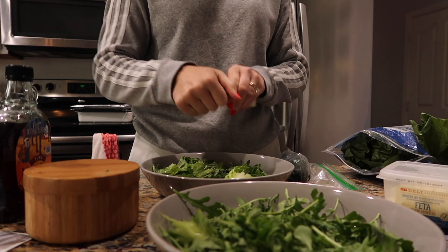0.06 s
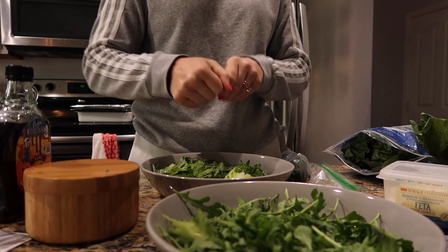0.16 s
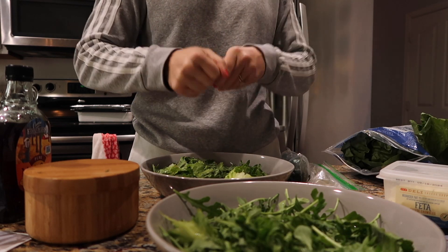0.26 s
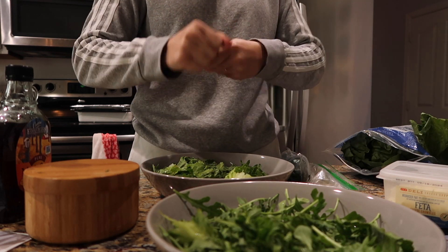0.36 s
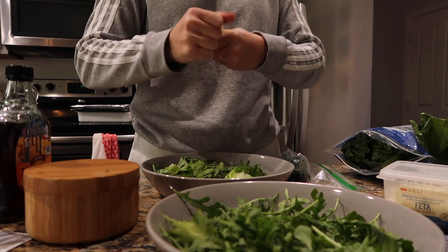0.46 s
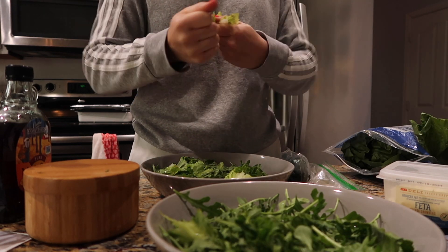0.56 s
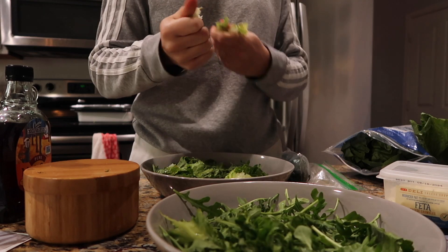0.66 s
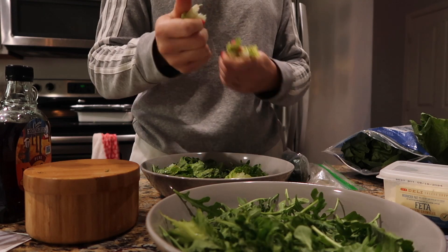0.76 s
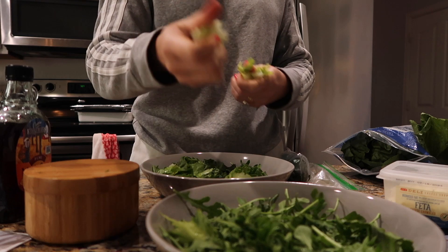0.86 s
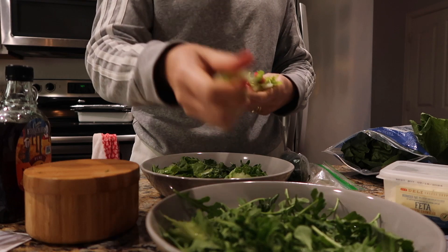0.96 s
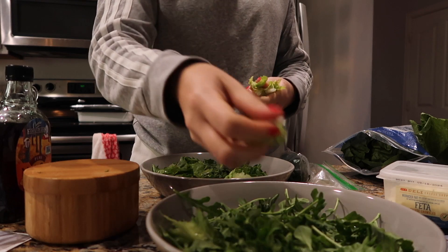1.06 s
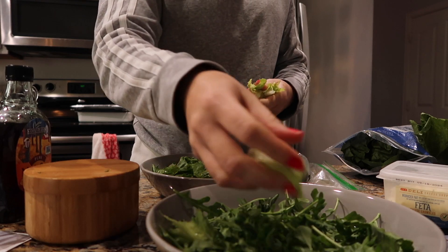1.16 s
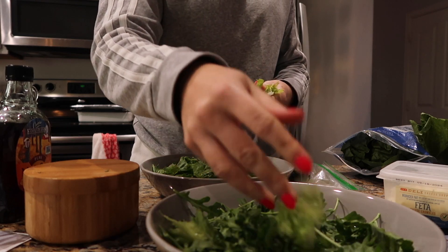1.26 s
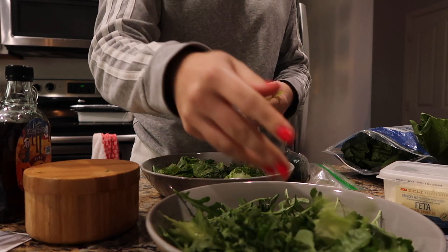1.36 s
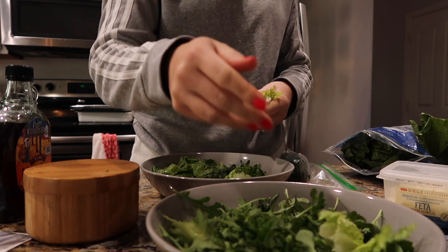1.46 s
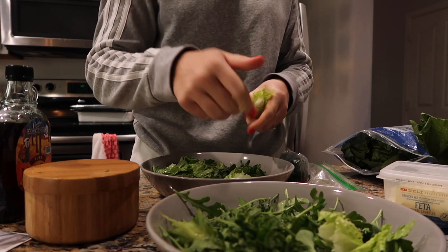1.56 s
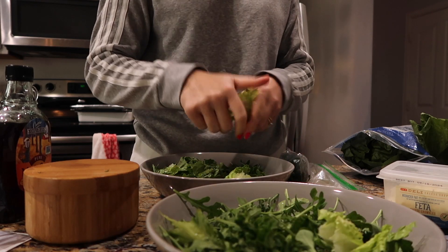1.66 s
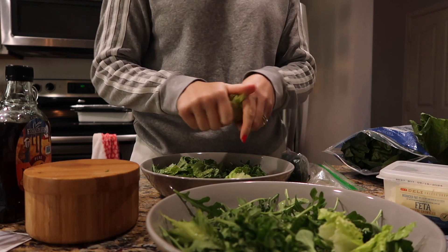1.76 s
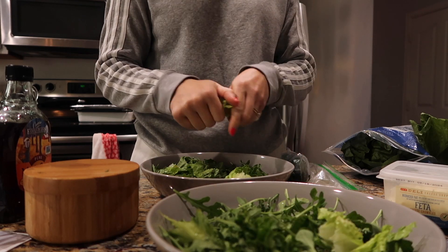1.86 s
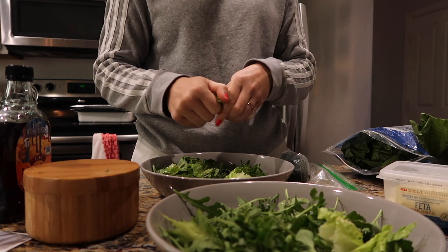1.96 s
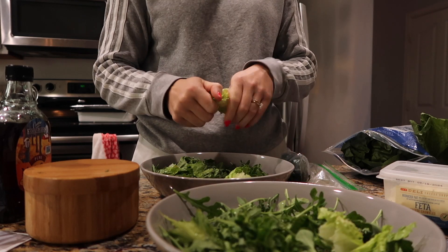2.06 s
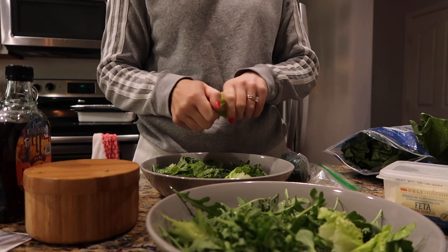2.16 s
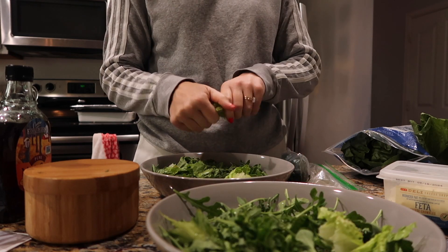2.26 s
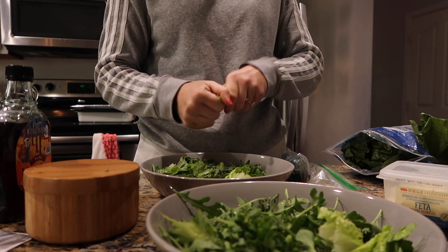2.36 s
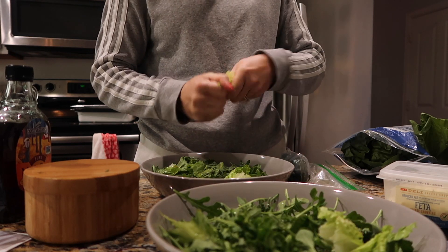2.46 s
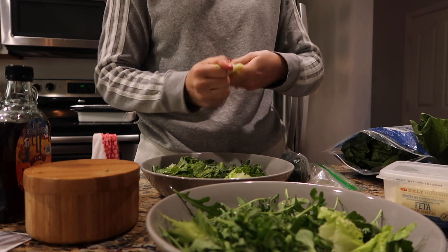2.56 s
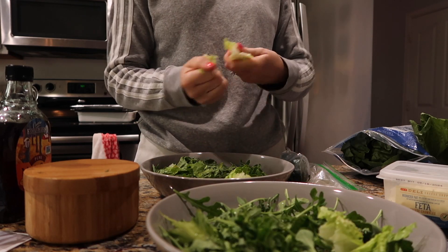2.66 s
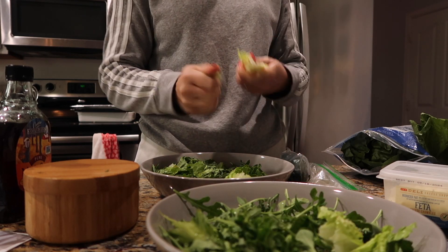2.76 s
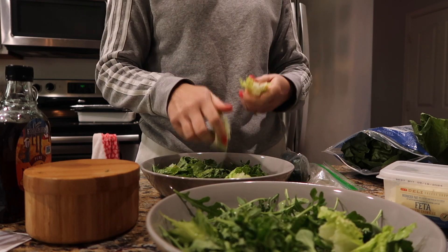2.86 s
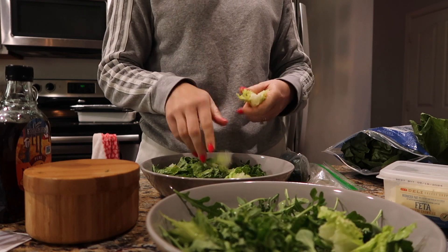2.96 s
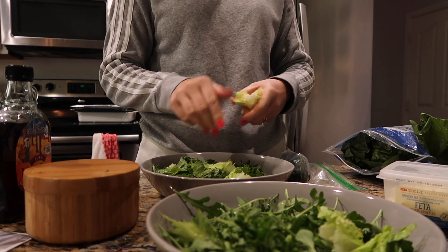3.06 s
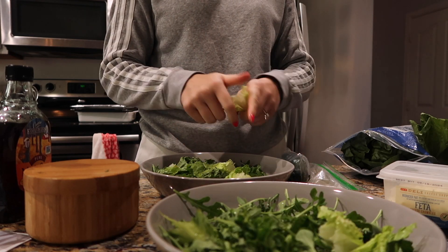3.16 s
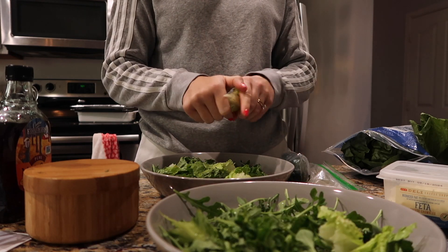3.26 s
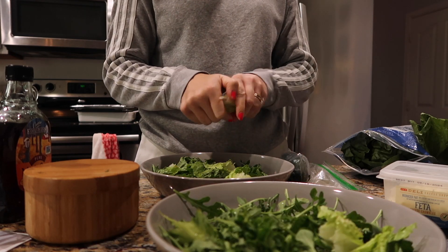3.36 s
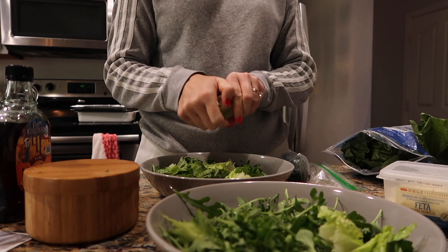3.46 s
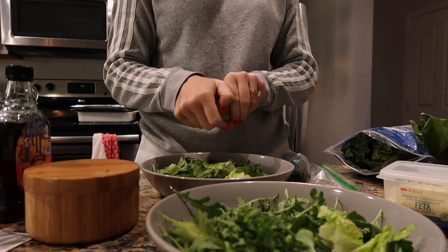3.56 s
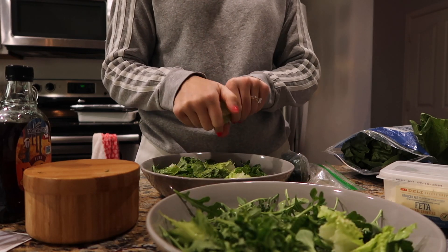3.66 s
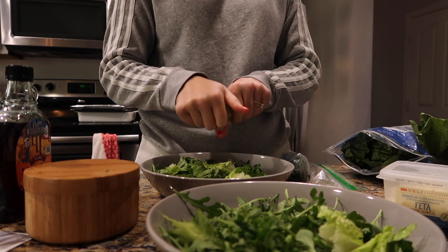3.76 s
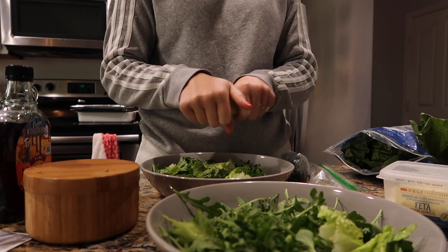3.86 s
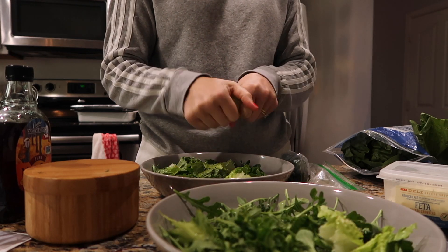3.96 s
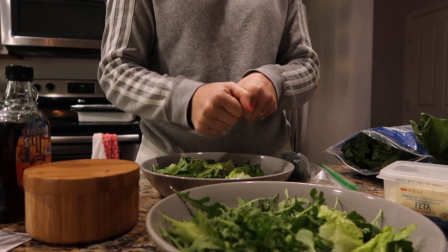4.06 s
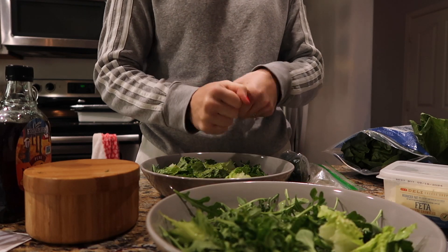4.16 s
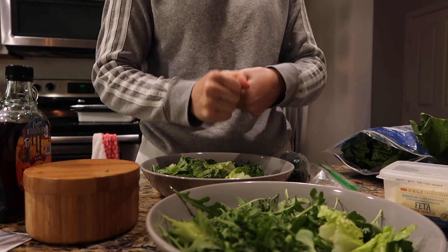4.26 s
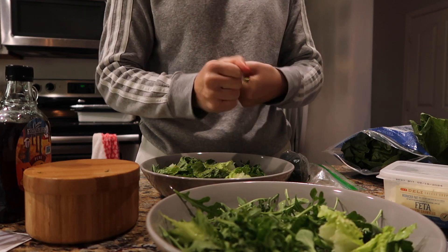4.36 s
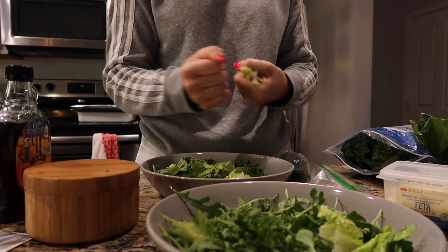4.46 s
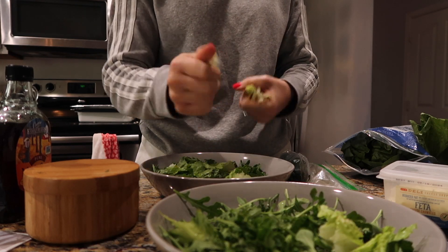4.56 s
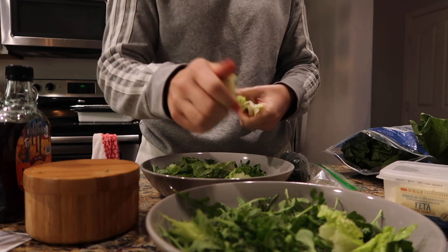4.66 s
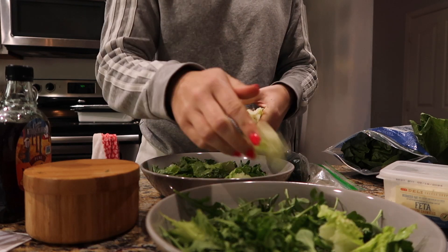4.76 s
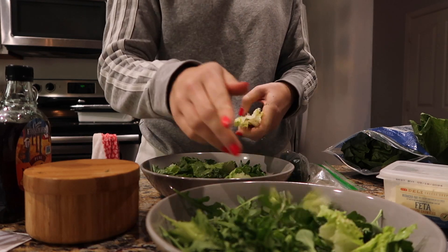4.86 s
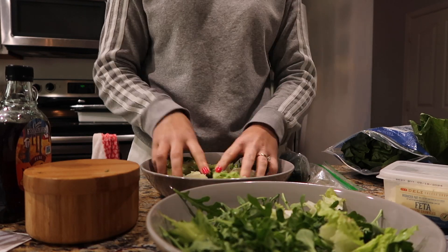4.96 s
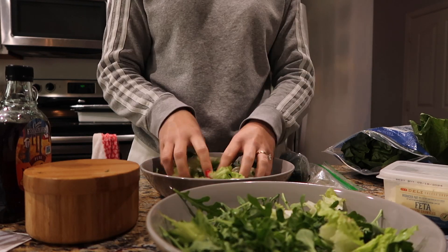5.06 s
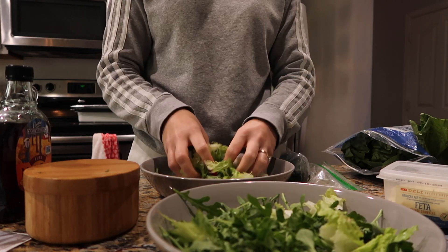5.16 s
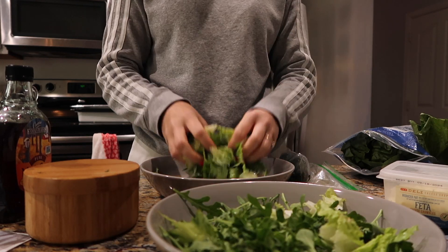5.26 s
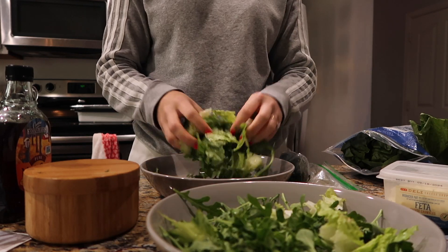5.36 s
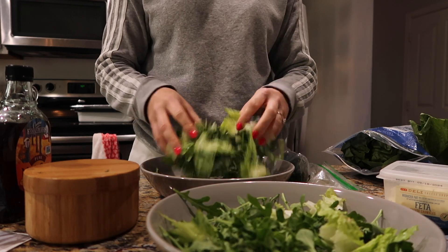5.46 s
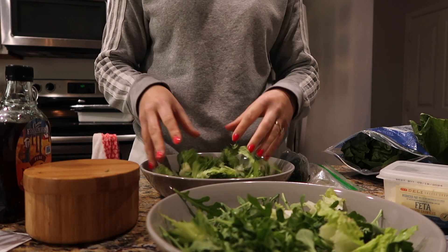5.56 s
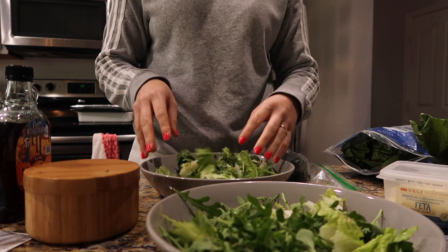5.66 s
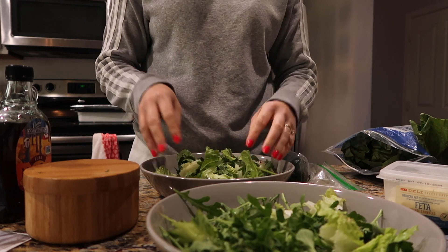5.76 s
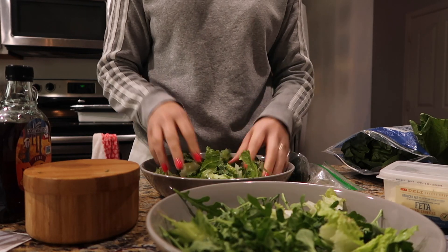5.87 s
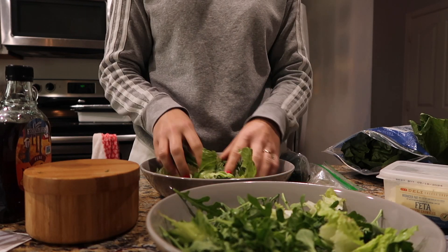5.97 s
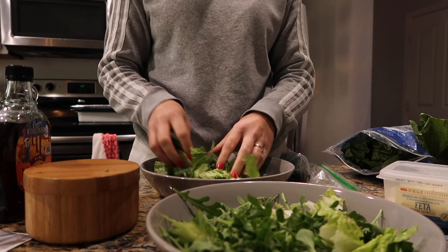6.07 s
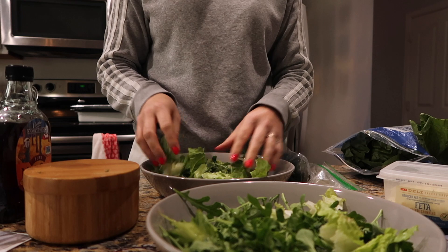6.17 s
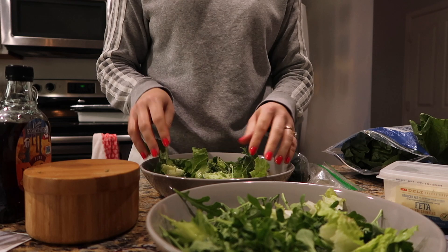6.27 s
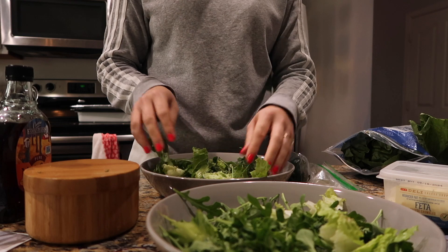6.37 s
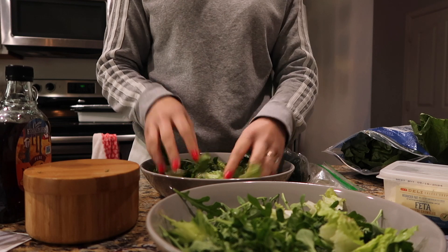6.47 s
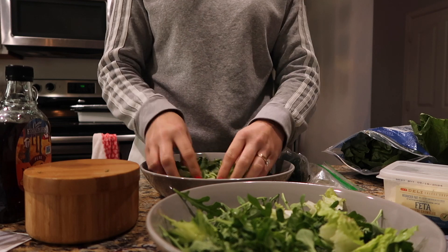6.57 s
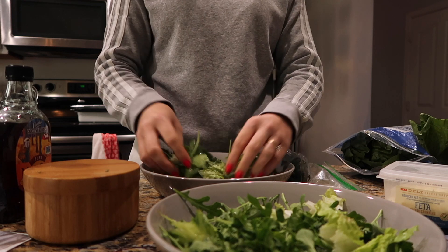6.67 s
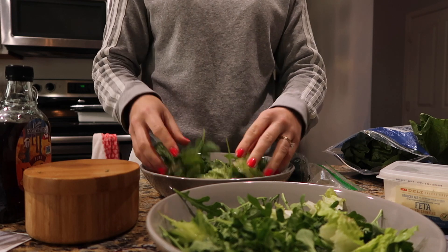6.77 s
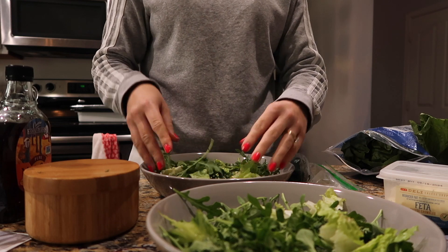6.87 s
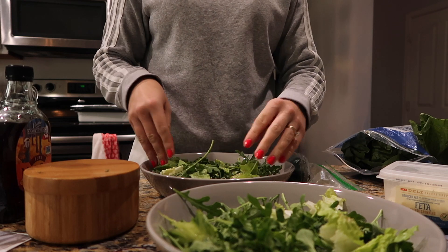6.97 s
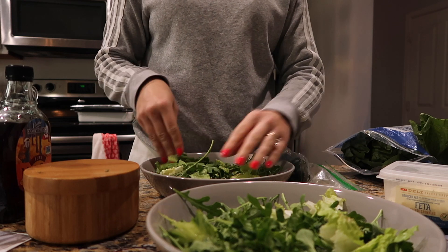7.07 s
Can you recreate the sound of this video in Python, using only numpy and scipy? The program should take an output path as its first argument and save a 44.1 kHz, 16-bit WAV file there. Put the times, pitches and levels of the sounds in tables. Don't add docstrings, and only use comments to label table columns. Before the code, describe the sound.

Juicy lettuce ribs crack and splinter between the palms, with hollow low pops and fine crackle, in separate irregular tears. After the last tear, limp leaves brush softly as fingers stir a ceramic bowl, bumping it and faintly ringing its rim with the nails. Recorded close in stereo in a small reflective kitchen, with short echoes, low fridge hum and faint air.

```python
import sys
import numpy as np
from scipy import signal
from scipy.fft import rfft, irfft, next_fast_len
from scipy.io import wavfile
from scipy.ndimage import uniform_filter1d, map_coordinates

SR = 44100
rng = np.random.default_rng(int(sys.argv[2]) if len(sys.argv) > 2 else 0)


def invert_db(x):
    u = np.asarray(x, float) / 20
    return 10 ** u


def waveform_to_disk(signal):
    frames = np.transpose(np.atleast_2d(signal))
    scaled = np.clip(frames, -1, 1) * 32767
    samples = np.round(scaled).astype(np.int16)
    wavfile.write(sys.argv[1], SR, samples)


N = 313110


def unit(x):
    return x / np.sqrt(np.mean(x ** 2) + 1e-20)


def along(points, hz):
    f, value = np.transpose(points)
    return np.interp(np.log(hz + 1), np.log(f + 1), value)


def filtered(x, response):
    m = next_fast_len(N + SR // 2)
    gain = response(np.fft.rfftfreq(m, 1 / SR))
    return irfft(rfft(x, m) * gain, m)[..., :N]


def bursts(s, db, hz, cycles, fall, rise, size, loose=7):
    s, db, hz, cycles = (np.broadcast_to(v, np.shape(s))[:, None] for v in (s, db, hz, cycles))
    chance = rng.standard_normal((len(s), 2))
    u = np.arange(size) / SR * hz / cycles
    sinking = fall * (1 - np.exp(-u))
    phase = 2 * np.pi * cycles * (u + sinking) + loose * chance[:, :1]
    shape = (u / abs(rise)) ** abs(rise) * np.exp(abs(rise) - u)
    wave = invert_db(db) * shape * np.sin(phase)
    where = (np.round(s * SR).astype(int) + np.arange(size)).ravel()
    pair = (wave, wave * chance[:, 1:])
    return np.array([np.bincount(where, w.ravel(), N + size)[:N] for w in pair])


def cluster(s, db, hz, count, hz_spread, smear, cycles, size, loose=7):
    chance = rng.standard_normal((len(s), count, 3))
    place = np.linspace(-1, 1, count) + chance[..., 0] / count
    pitch = np.asarray(hz)[..., None] * np.exp(hz_spread * place)
    when = s[:, None] + smear * (.8 * chance[..., 1] - .6 * place) - 1.6 * cycles / pitch
    level_db = db[:, None] - 8 * place ** 2 + 0.47 * chance[..., 2]
    return bursts(when.ravel(), level_db.ravel(), pitch.ravel(), cycles, .25, 1.8, size, loose)


def grains(count, hz, hz_spread, cycles, size_db, clump_db, size):
    s = np.sort(rng.random(count)) * N / SR
    pitch = np.clip(hz * np.exp(hz_spread * rng.standard_normal(count)), 100, 16000)
    strength = np.minimum(rng.exponential(size=count), 4.5)
    clumps = map_coordinates(rng.standard_normal(600), [s * 80])
    pair = bursts(s, size_db * strength + clump_db * clumps, pitch, cycles, 0.28, 0.76, size)
    slow = np.sqrt(np.abs(uniform_filter1d(pair[0] ** 2, SR // 8)) + 1e-9)
    return pair / slow


def levels(rows):
    s, *columns = np.transpose(rows)
    return [invert_db(np.interp(np.arange(N) / SR, s, db, -120, -120)) for db in columns]


# (t/s, peak level/dB, leaf pitch f/Hz, cupped-hand boom level/dB)
BREAKING_RIBS = [(0.077, -28.5, 2640, -16), (0.0852, -25.5, 2260, -17.5), (0.0977, -23.5, 3100, -12),
                 (0.12, -23, 2970, -23), (0.1268, -30, 3600, -33), (0.135, -23, 2860, -33.5),
                 (0.158, -24, 1810, -26.5), (0.1688, -31, 3060, -34), (0.178, -25, 2370, -43),
                 (0.187, -25, 2820, -30), (0.222, -20.5, 2590, -54), (0.243, -15, 2420, -34.5),
                 (0.2524, -24, 2960, -37), (0.2588, -20.5, 2700, -39.5), (0.2674, -17.5, 2300, -38),
                 (0.2807, -13.5, 2740, -35), (0.294, -19, 2210, -35), (0.3014, -17.5, 3170, -40),
                 (0.3092, -31, 3320, -36.5), (0.338, -33, 2810, -26), (0.346, -1, 2220, -36.5),
                 (0.351, -12.5, 2480, -32), (0.3565, -10.5, 2420, -31), (0.3603, -11.5, 2900, -38),
                 (0.3683, -6.5, 2800, -34), (0.3721, -6, 3170, -17), (0.375, -16.5, 2630, -37),
                 (0.3809, -16.5, 3200, -21), (0.385, -15, 3120, -40), (0.397, -12, 2930, -24),
                 (0.4052, -14, 3080, -33), (0.4082, 1, 2750, -39), (0.4178, -17.5, 2650, -17),
                 (0.4246, -12, 2840, -15), (0.437, -25, 2400, -21), (0.445, -23, 2600, -21),
                 (0.4644, -31, 2900, -38), (0.4683, -31, 2570, -19), (0.4974, -37, 3240, -23),
                 (0.5, -17.5, 2700, -42), (0.5146, -29, 3270, -36), (0.526, -15, 2800, -26),
                 (0.5374, -18.5, 2800, -20.5), (0.548, -4, 3030, -53), (0.558, -16, 4000, -22),
                 (0.563, -14, 3640, -24), (0.5697, -25, 3380, -23.5), (0.5777, -32, 2650, -28),
                 (1.6321, -24.5, 2890, -14.5), (1.6403, -23.5, 3330, -45), (1.789, -42, 2060, -5),
               (1.863, -33, 3820, -26), (1.9104, -25.5, 3190, -20), (1.915, -36, 3400, -25),
               (1.9431, -27.5, 2900, -28), (1.9625, -32, 2250, -22), (1.995, -24.5, 2260, -35),
               (2.0045, -28, 2670, -26), (2.0154, -17.5, 3820, -16.5), (2.0247, -19, 4830, -34),
               (2.0283, -24, 4600, -24), (2.0292, -24.5, 2150, -30), (2.0375, -21, 4650, -52),
               (2.0448, -33, 4540, -33), (2.0578, -30, 4840, -30), (2.0775, -32, 3100, -27),
               (2.111, -32, 3280, -31), (2.2008, -30, 3160, -18), (2.2107, -32.5, 4040, -18),
               (2.2213, -25.5, 3010, -32.5), (2.24, -36, 3660, -32), (2.2459, -23, 2650, -47),
               (2.2563, -23.5, 3700, -36), (2.266, -24.5, 3550, -44), (2.2782, -27, 2550, -35),
               (2.2901, -39, 3240, -33), (2.305, -33, 2580, -38), (2.3181, -37, 2700, -27),
                 (2.3464, -30, 3420, -17), (2.3626, -26, 3000, -25), (2.3745, -26, 3000, -31),
              (2.389, -27, 3140, -16), (2.393, -23.5, 3660, -49), (2.4031, -22, 2780, -33),
              (2.414, -34, 3740, -18), (2.428, -30, 3600, -29), (2.4363, -38, 2250, -37),
              (2.4416, -31, 3020, -26), (2.4487, -20, 2420, -24), (2.458, -16, 2650, -33),
              (2.4717, -24, 2800, -26), (2.4762, -13, 3140, -37), (2.48, -22, 2450, -5.5),
              (2.4844, -21, 2580, -23), (2.49, -23, 3280, -29), (2.4978, -22.5, 3660, -16),
              (2.5125, -21, 2340, -31), (2.5197, -23, 2530, -37), (2.5337, -22, 3050, -32),
              (2.5423, -7.0, 3000, -15), (2.546, -28, 3470, -23.5), (2.5512, -17, 4300, -37),
              (2.5568, -25, 3500, -6), (2.5609, -21, 2700, -24), (2.565, -17, 3000, -15),
              (2.5731, -14.5, 3300, -30), (2.5817, -23.5, 3530, -28), (2.594, -33.5, 3310, -20),
              (2.5975, -17, 3250, -31), (2.61, -22, 3430, -29), (2.6159, -20, 3180, -35),
              (2.62, -16.5, 3700, -31), (2.6293, -21, 3284, -31), (2.6359, -10, 2820, -13),
              (2.6452, -16.5, 2460, -19), (2.6478, -21, 3120, -23), (2.6523, -33, 3100, -19),
              (2.659, -22, 2930, -29), (2.6646, -26, 2780, -23), (2.6752, -32, 3190, -7),
                 (2.913, -31, 2700, -30), (2.919, -35, 2640, -34), (2.9302, -37, 3080, -30),
               (2.9528, -29.5, 2970, -35), (3.1602, -27.5, 3200, -29), (3.19, -30, 3360, -41),
               (3.1936, -25, 3420, -44), (3.2593, -36, 3580, -17), (3.2674, -29, 3030, -24),
               (3.3442, -40.5, 3100, -35), (3.4665, -36.5, 2600, -32), (3.491, -41.5, 3050, -32),
               (3.503, -29.5, 3130, -27), (3.515, -25, 3000, -19), (3.5216, -27, 2950, -37),
               (3.5284, -17, 2720, -66), (3.5616, -31, 2880, -26), (3.565, -25.5, 3360, -31),
               (3.5724, -23, 3050, -36), (3.5827, -30, 3120, -40), (3.5884, -30, 3180, -31),
               (3.593, -22, 2930, -32), (3.6018, -24, 3160, -32), (3.6053, -17.5, 2760, -38),
               (3.6476, -24.5, 3220, -16), (3.67, -27.5, 2270, -29), (3.6731, -24, 2960, -29),
               (3.6806, -50, 3370, -27), (3.7021, -24, 2670, -36.5), (3.7126, -47, 3120, -23),
                 (3.8626, -36.5, 3220, -14), (3.88, -29.5, 2450, -15), (3.885, -37, 3120, -25),
              (3.8968, -15.5, 3120, -23), (3.9077, -20, 3200, -19), (3.9157, -29, 3040, -27),
              (3.9195, -24, 1980, -29.5), (3.9287, -28, 2300, -31), (3.941, -21, 2850, -9.5),
              (3.963, -17.5, 2870, -14), (3.976, -32, 3600, -6), (3.9791, -35, 2720, -27),
              (3.9984, -32, 3170, -36), (4.0136, -16, 2910, -17), (4.024, -34, 3360, -19),
              (4.0435, -19, 1860, 2), (4.0543, -16, 3540, -29), (4.0578, -15, 2140, -24),
              (4.0687, -6.5, 3340, -30), (4.0787, -19, 3740, -34), (4.0834, -21, 3600, -37),
              (4.099, -26, 2180, -15), (4.1202, -40, 2870, -18), (4.1346, -30.5, 2200, -29),
              (4.1428, -27.5, 1790, -8), (4.15, -25, 2050, -16),
                 (4.167, -33, 3630, -37), (4.1709, -28, 3570, -20), (4.1768, -18, 2800, 4),
              (4.1811, -11.5, 2850, -16), (4.1911, -11.5, 3430, -23), (4.2004, -17, 2840, -16),
              (4.2164, -21, 3530, -28), (4.2249, -8.5, 2160, -11), (4.2349, -14.5, 3480, -27),
              (4.2396, -18.5, 2600, -10), (4.2491, -31, 2750, -22), (4.261, -26, 2430, -18),
              (4.2763, -10.5, 2730, -19), (4.279, -14, 3150, -20), (4.2858, -18.5, 3300, -15.5),
              (4.2881, -16, 3300, -20), (4.2947, -36, 2630, -16), (4.3023, -32, 3200, -26),
              (4.3085, -32, 2830, -21), (4.3111, -38, 2170, -20), (4.3163, -17, 3370, -20),
              (4.3223, -23, 3120, -32), (4.3262, -18, 2780, -36), (4.3307, -23, 2950, -38),
              (4.3386, -45, 2780, -33), (4.3442, -24, 2840, -32), (4.352, -34, 3410, -25),
              (4.3578, -17.5, 3240, -44), (4.3709, -41, 2950, -47), (4.3803, -42, 3310, -30),
              (4.3839, -36, 2600, -25), (4.405, -36, 2860, -27), (4.4103, -15, 3410, -43),
              (4.423, -17.5, 2050, -37), (4.427, -15.5, 3180, -42), (4.4325, -17.5, 3380, -31),
              (4.4373, -21, 3400, -34), (4.4461, -20.5, 2380, -39), (4.453, -36, 3680, -27),
              (4.4775, -31, 2133, -26)]
RIBS = BREAKING_RIBS
# (t/s, peak level/dB)
SKIN_TICKS = [(0.107, -42), (0.2192, -53), (0.266, -26), (0.3465, -29), (0.408, -41), (0.448, -34),
              (0.4994, -44), (0.5478, -24), (1.0016, -47), (1.069, -45), (1.304, -40), (1.9157, -36.5),
              (2.0065, -33), (2.0141, -23), (2.111, -40.5), (2.1273, -46), (2.159, -41), (2.3338, -43),
              (2.365, -40.5), (2.3846, -37), (2.4165, -37), (2.4605, -32), (2.474, -32), (2.541, -18.5),
              (2.5988, -35), (3.3732, -51), (3.5285, -40), (3.7024, -43), (3.8623, -51), (3.8962, -37),
              (3.9442, -35), (3.9629, -43.5), (4.0136, -40), (4.0532, -45), (4.0685, -54), (4.0785, -32),
              (4.1061, -33), (4.182, -30), (4.2255, -37), (4.2352, -27), (4.3126, -28), (4.4219, -29.5),
              (4.6379, -46), (5.9665, -41), (5.997, -46)]
CRACK_RUNS_S = 0.0011


def snaps():
    s, db, hz, cup_db = np.transpose(RIBS)
    s = s + CRACK_RUNS_S
    rib_hz, rib_follows = 3100, 1
    crack_hz = rib_hz * (hz / rib_hz) ** rib_follows
    crack = cluster(s, db - 8.5, crack_hz, count=7, hz_spread=.4, smear=.00012, cycles=1.7, size=400, loose=.8)
    boom_db = db + 15 + cup_db
    boom = cluster(s + .0022, boom_db - 2.5, 980, count=2, hz_spread=.1, smear=.0008, cycles=2.6, size=1600)
    upper_boom = cluster(s + .0016, boom_db - 17, 1700, count=2, hz_spread=.03, smear=.0007, cycles=3.2, size=900)
    tick_s, tick_db = np.transpose(SKIN_TICKS)
    tick_s = tick_s + CRACK_RUNS_S
    bright_s, bright_db = np.r_[s, tick_s], np.r_[db - 40, tick_db + 1.5]
    tick = cluster(bright_s, bright_db, 12000, count=6, hz_spread=.19, smear=.00062, cycles=1.7, size=120)
    tick_body = cluster(tick_s, tick_db - 3, 5630, count=6, hz_spread=.56, smear=.00036, cycles=1.5, size=200)
    jolt_db, jolt_grows = -25.5, 1
    thump = bursts(s, jolt_db + jolt_grows * (db + 14.0), 390, cycles=.16, fall=1.0, rise=.4, size=900)
    return crack + invert_db(-12.0) * boom + upper_boom + tick + tick_body + thump


def aftermath(fade, swell):
    s, db = np.transpose(RIBS)[:2]
    power = np.bincount(np.round((s + CRACK_RUNS_S) * SR).astype(int), invert_db(2 * db), N)

    def smear(p, life):
        return signal.lfilter([1], [1, -np.exp(-1 / (life * SR))], p)

    before = smear(power[::-1], swell)[::-1]
    return np.sqrt(smear(power, fade) + before)


# (t/s, strain on the leaf level/dB, cupping level/dB)
PULLING_HANDS = [(0, -50, -2.5), (.2, -43.5, -34), (.37, -33.5, -20), (.47, -32.5, -2.5), (.6, -46.5, -29),
                 (1.3, -60.5, -24), (1.95, -51, -30), (2.3, -50, -31), (2.56, -30.5, -19), (2.66, -34, -6),
                 (2.74, -46, -1.5), (3.3, -62, -36), (3.94, -55, -11), (4.09, -31.5, -14), (4.21, -34, -12),
                 (4.3, -27.5, -15), (4.46, -43, -28), (4.8, -59, -25)]


def crackle():
    strain, cup = levels(PULLING_HANDS)
    rustle = invert_db(-43.5) * (strain * invert_db(33.0)) ** 1.11
    after = aftermath(fade=.006, swell=.001)
    cells = grains(count=16000, hz=2700, hz_spread=.42, cycles=.8, size_db=2.2, clump_db=2.5, size=160)
    palms = grains(count=3000, hz=980, hz_spread=.12, cycles=2.4, size_db=2.5, clump_db=3, size=600)
    upper_palms = grains(count=3000, hz=1700, hz_spread=.07, cycles=4, size_db=2.5, clump_db=3, size=600)
    palms = palms + invert_db(-4) * upper_palms
    skin = grains(count=25000, hz=10000, hz_spread=.38, cycles=1.1, size_db=2.2, clump_db=2.5, size=60)
    tearing = invert_db(-5.5) * strain + invert_db(-27) * after
    hollow_db = -11
    in_hands = cells + invert_db(hollow_db + 11.0) * cup * palms
    return tearing * in_hands + (rustle + invert_db(-29.5) * after) * skin


# (t/s, peak level/dB, gathering t/s, settling t/s, weight of the handful level/dB)
LEAF_STROKES = [
    (1.34, -49.5, 0.093, 0.17, -23),
    (4.904, -43, 0.0069, 0.12, -20),
    (5.03, -59, 0.22, 0.12, 19.5),
    (5.14, -42, 0.14, 0.41, 2.5),
    (5.6, -46, 0.055, 0.14, 12),
    (5.97, -42.5, 0.014, 0.058, 1),
    (6.051, -48.5, 0.13, 0.36, 4.5),
    (6.62, -50, 0.18, 0.37, 13),
]


def toss():
    hush = grains(count=22000, hz=2600, hz_spread=.24, cycles=1.6, size_db=2.8, clump_db=3, size=200)
    flop = grains(count=6000, hz=900, hz_spread=.45, cycles=.7, size_db=1.5, clump_db=2.5, size=350)
    sheen = grains(count=25000, hz=10000, hz_spread=.3, cycles=.8, size_db=1.5, clump_db=2.2, size=50)
    s, db, gather, settle, weight_db = np.transpose(LEAF_STROKES)[..., None]
    since = np.arange(N) / SR - s
    swell_db = 20
    brush = invert_db(db - swell_db * np.maximum(-since / gather, since / settle))
    low = (brush * invert_db(weight_db)).sum(axis=0)
    glide_db = -20 + 1 * np.log2(gather * 10)
    high = (brush * invert_db(glide_db)).sum(axis=0)
    return invert_db(-3.0) * brush.sum(axis=0) * hush + invert_db(-8.0) * low * flop + invert_db(10.5) * high * sheen


# (t/s, peak level/dB, thud pitch f/Hz,
# scrape level/dB)
FINGERTIPS = [(1.305, -53, 371, -6), (4.9, -55.5, 328, 19.5), (5.004, -29.5, 227, -30),
              (5.051, -37.5, 265, -21), (5.115, -58, 400, 19), (5.146, -48, 400, 13), (5.168, -65, 400, 10),
              (6.029, -62, 397, 13), (5.25, -42, 610, -13), (5.581, -32.5, 494, -32),
              (5.649, -36.5, 483, -8), (5.967, -49, 600, -10), (6.396, -33.5, 630, -34),
              (6.586, -23, 790, -20), (6.59, -26, 303, -19), (6.603, -24.5, 614, -21)]


def bowl():
    s, db, hz, scrape_db = np.transpose(FINGERTIPS)
    thud = cluster(s + .00277, db - 6, hz * 1.115, count=10, hz_spread=.62, smear=.00383, cycles=1.627, size=2000)
    scrape_db = db + scrape_db - 3.5
    scrape = cluster(s + .004, scrape_db, 2650, count=14, hz_spread=.27, smear=.004, cycles=1.2, size=400)
    return thud + scrape


# (f/Hz, time to die by 60 dB t/s)
BOWL_MODES = [(1550, .55), (1746, .46), (2433, .48), (2942, .35), (3450, .2)]
# (f/Hz, time to die by 60 dB t/s)
BELLY_MODE = (612, .3)
FAR_SIDE = (1, 3)
# (t/s, belly level/dB, near side level/dB, far side level/dB, hardness in dB per octave)
NAILS = [(4.995, -53, -59, -57, 2), (5.05, -51, -57, -63, -6), (5.1172, -56, -56, -55, 2),
         (5.1685, -62, -62, -48, -3), (5.251, -68, -63, -49, -2), (5.5825, -50, -46, -52, 1),
         (5.6274, -46, -46, -50, -10), (5.68, -70, -60, -53, -6), (5.969, -56, -58, -56, -4),
         (6.035, -60, -63, -68, 10), (6.1, -70, -75, -60, 0), (6.2546, -63, -57, -65, -8),
         (6.3974, -46, -55, -76, 2), (6.4934, -59, -51, -68, 1.5), (6.584, -50, -42, -58, -22),
         (6.635, -63, -56, -51, -16), (6.7, -58, -60, -56, -5), (6.765, -60, -72, -64, -10),
         (6.866, -65, -55, -70, -6)]


def rim():
    ring, t = np.zeros(N + SR), np.arange(SR // 2) / SR
    for start, belly_db, near_db, far_db, hardness in NAILS:
        strengths = []
        for k, (f, t60) in enumerate(BOWL_MODES):
            far = k in FAR_SIDE
            octaves = np.log2(f / BOWL_MODES[int(far)][0])
            strengths.append((far_db if far else near_db) + hardness * octaves)
        strengths[-1] -= 9
        strengths.append(belly_db)
        tone = 0
        for (f, t60), db in zip(BOWL_MODES + [BELLY_MODE], strengths):
            waver_db = 3.5 * map_coordinates(rng.standard_normal(30), [t * 55])
            beating = np.sin(2 * np.pi * f * t) + 0.5 * np.sin(2 * np.pi * (f + 4.6) * t)
            tone = tone + invert_db(db - 60 * t / t60 + waver_db) * beating
        ring[round(start * SR):][:len(t)] += tone * (1 - np.exp(-t / 0.00027))
    return ring[:N] * np.array([[1], [.5]])


# (t/s, level/dB)
NEAR_WALLS = [
    (.0032, -14),
    (.0061, -18),
    (.0095, -19),
    (.016, -25),
]
# (f/Hz, time to die by 60 dB t/s)
ROOM_RING = [(300, .2), (900, .3), (1900, .75), (4400, .7), (7000, .35), (12000, .1)]


def kitchen(x):
    early = 0
    for s, db in NEAR_WALLS:
        echo = np.roll(uniform_filter1d(x, size=3), round(s * SR), axis=1)
        early = early + invert_db(db) * rng.choice([-1, 1], (2, 1)) * echo
    hz, t, z = signal.stft(rng.standard_normal((2, SR)), SR, nperseg=256)
    dying = invert_db(-60 * t / along(ROOM_RING, hz)[:, None]) * (1 - np.exp(-t / 0.0067))
    tail = signal.istft(z * dying, SR, nperseg=256)[1]
    tail = tail / np.linalg.norm(tail[0])
    late = signal.fftconvolve(np.pad(x[0], (400, 0))[None], tail, axes=1)[:, :N]
    return early + late * invert_db([[-14.5], [-11.5]])


# (f/Hz, level/dB per Hz)
ROOM_AIR = [(25, -10), (52, -5), (135, -7.5), (202, -3), (700, -13.5), (2200, -20.5), (13200, -36),
            (15000, -58)]
# (f/Hz, width f/Hz, level/dB)
FRIDGE = [(61.6, 21, -63), (91.5, 9.6, -69.5), (115.8, 3.8, -65), (208.3, 7.1, -69.5), (327.4, 61, -65.5)]
# (f/Hz, width f/Hz, level/dB)
ELECTRIC_WHINE = (13050, 20, -92)
# (f/Hz, likeness from -1 to 1)
LEFT_RIGHT_ALIKE = [(60, 1.0), (180, 0.93), (550, 0.3), (1650, -0.1), (4970, 0.034), (15000, -0.26)]


def background():
    def pair(hz):
        turn = np.arccos(np.clip(along(LEFT_RIGHT_ALIKE, hz), -1, 1)) / 2
        return np.array([np.cos(turn), np.sin(turn)])

    def lines(hz):
        return sum(invert_db(db) * np.sqrt(SR / width) * np.exp(-((hz - center) / width) ** 2)
                   for center, width, db in FRIDGE + [ELECTRIC_WHINE])

    air = filtered(rng.standard_normal((2, N)), lambda hz: invert_db(along(ROOM_AIR, hz)) * pair(hz))
    hum = filtered(rng.standard_normal((2, N)), lambda hz: lines(hz) * pair(hz))
    return invert_db(-55.5) * unit(air) + hum


# (f/Hz, level/dB)
MIC_TONE = [(60, -18), (250, -12.5), (600, -4), (1500, -1.5), (3000, -1.5), (6000, 2), (8000, -4),
            (10000, -10), (12500, -4), (15000, -9), (16400, -16)]
# (f/Hz, level/dB)
SIDE_SPREAD = [(60, -40.5), (130, -9), (290, -23), (640, -18.5), (1410, -45), (3100, -17), (6820, 0.5),
               (15000, 0)]


def scene():
    near = snaps() + crackle() + toss() + bowl()
    heard = near + kitchen(near) + rim()

    def microphone(hz):
        side_lag = 1j * invert_db(along(SIDE_SPREAD, hz))
        return invert_db(along(MIC_TONE, hz)) * np.array([1 + 0 * hz, side_lag])

    mid, side = filtered(heard, microphone) + background()
    return np.array([mid + side, mid - side])


def roll_off(x):
    return signal.sosfilt(signal.butter(12, 16510, fs=SR, output="sos"), x)


def record(dry):
    soft = dry / (1 + np.abs(dry / 1.3) ** 4) ** (1 / 4)
    mix = filtered(soft, lambda hz: hz < 16300)
    return roll_off(mix)


dry = scene()
out = record(dry)
waveform_to_disk(out)
```